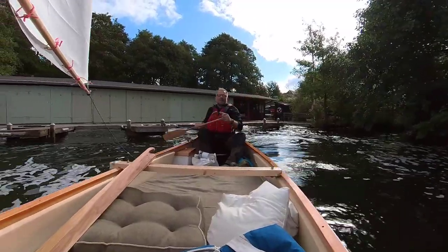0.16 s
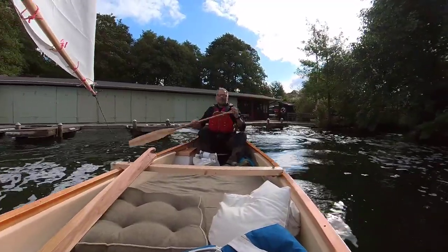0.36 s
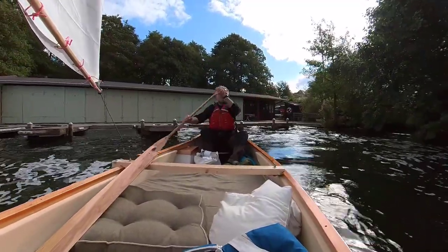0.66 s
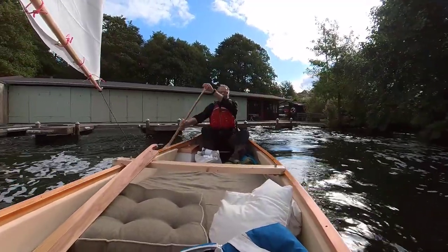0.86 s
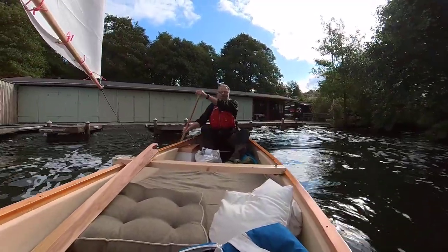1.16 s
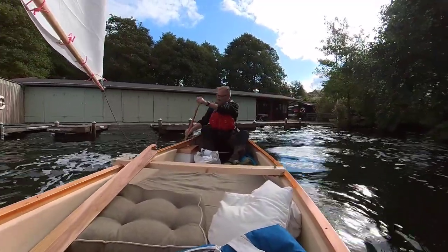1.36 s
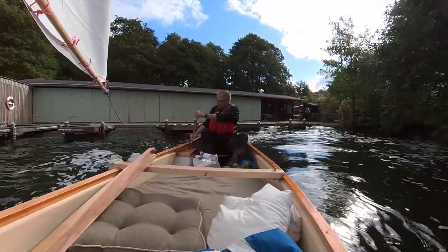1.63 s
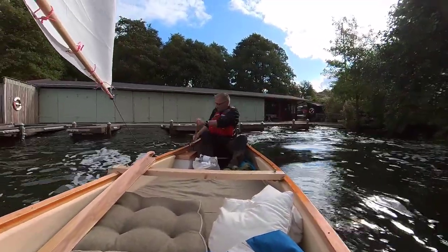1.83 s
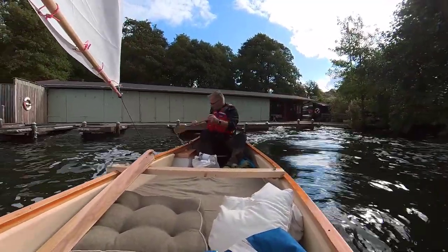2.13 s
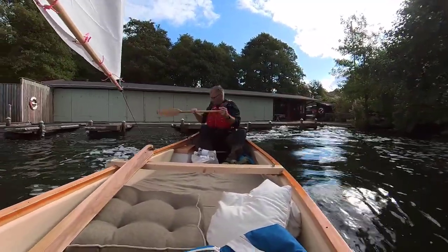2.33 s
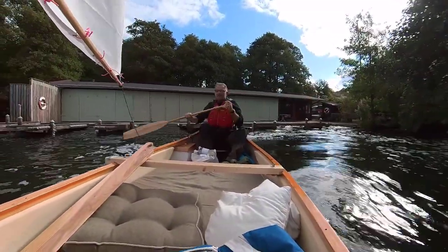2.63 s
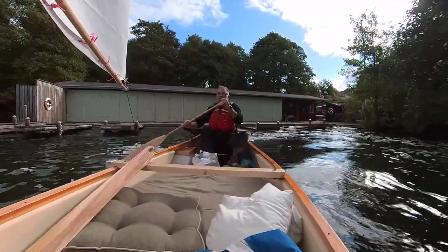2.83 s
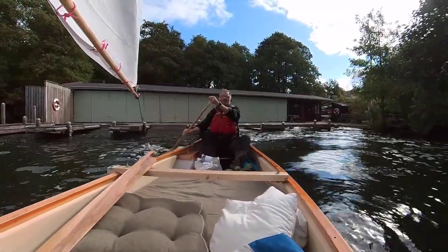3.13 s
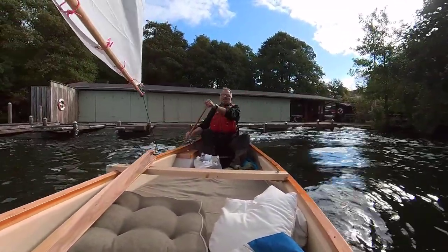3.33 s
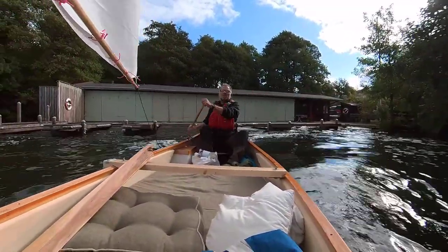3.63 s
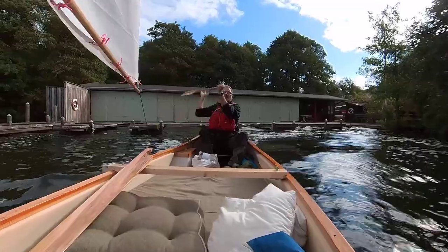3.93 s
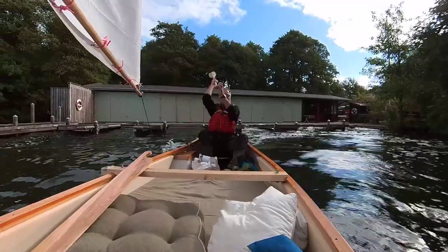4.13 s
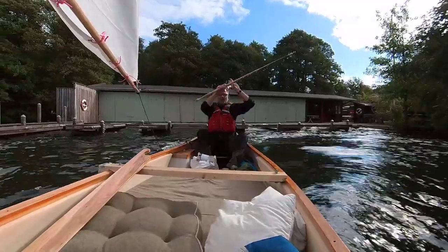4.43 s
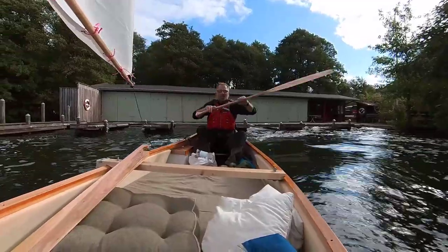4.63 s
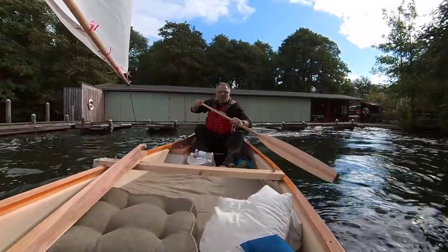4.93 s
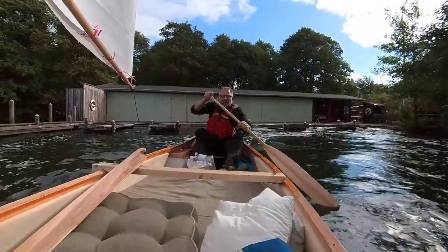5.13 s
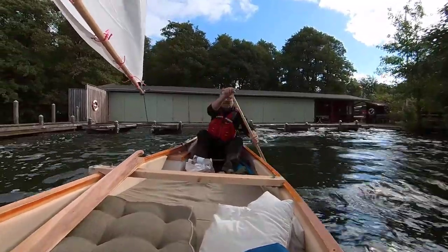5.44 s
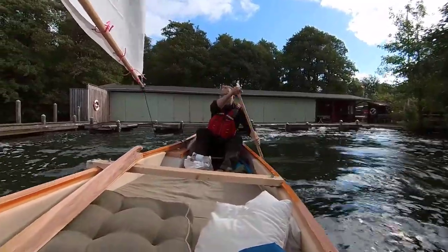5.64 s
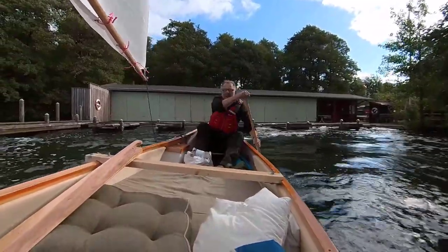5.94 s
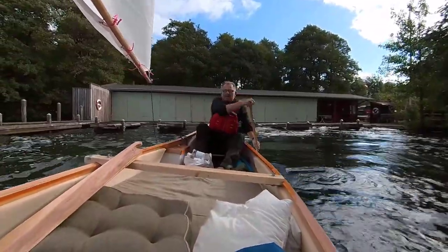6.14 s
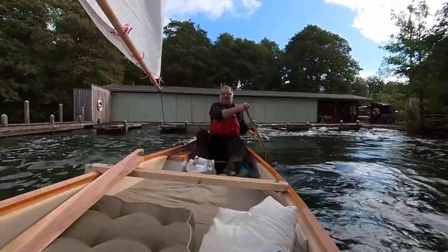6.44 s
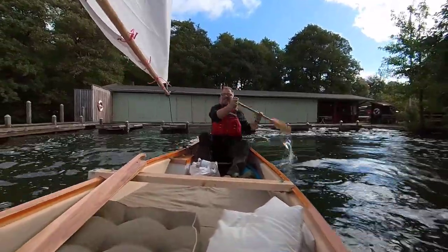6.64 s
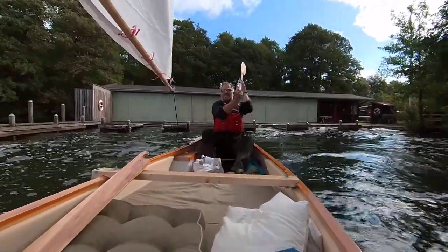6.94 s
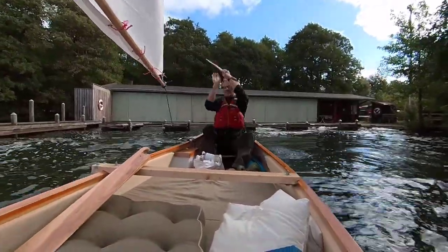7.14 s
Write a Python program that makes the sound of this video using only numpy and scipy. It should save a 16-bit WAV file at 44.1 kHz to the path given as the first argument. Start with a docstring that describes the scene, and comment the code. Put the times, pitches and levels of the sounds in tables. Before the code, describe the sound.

From inside a wooden canoe on calm open water, soft gurgling runs along the planks with a few quiet bubbles. A cluster of hollow slaps and splashes strikes after two seconds, another past three and a half, then harder thumps near four and a half, five and six. Drops tick and spray patters between them; low wind buffets the close stereo microphone unevenly.

```python
"""Wooden canoe over small waves

Heard from inside the boat. Waves slap the hull: ringing air pockets thump, then filtered bubble swarms churn.
Water breaks in short bursts of foam, single bubbles plop as gliding tones, and spray patters and fizzes back.
Drops tick, the bow wave folds over and water gurgles along the planks, all built from swarms or single rings.
Gusts buffet the microphone as low, lumpy noise that hits its two ports unequally.
"""
import sys
import numpy as np
from scipy import signal
from scipy.io import wavfile
from scipy.ndimage import uniform_filter1d

SR = 44100
rng = np.random.default_rng(int(sys.argv[2]) if len(sys.argv) > 2 else 0)


def persist_wave(psi):
    """Save psi, clipped to +-1, as 16-bit WAV."""
    counts = np.round(np.clip(psi, -1, 1) * 32767).astype(np.int16)
    wavfile.write(sys.argv[1], SR, np.atleast_2d(counts).T)


N = 321489
TIME = np.arange(N) / SR

# Waves striking the hull: start_s, thump_peak_db, pocket_pitch_hz, pocket_t60_s, churn_level_db
HULL_SLAPS = [(0.026, -21.5, 188, 0.046, -45), (0.44, -32, 338, 0.14, -36.5),
              (0.813, -34, 234.5, 0.38, -42), (1.006, -32.5, 404, 0.15, -36.5),
              (1.187, -26.5, 148, 0.05, -55), (1.221, -28.5, 198, 0.089, -41), (1.27, -30, 272, 0.12, -48),
              (2.246, -23.5, 240, 0.028, -37), (2.314, -19.5, 408, 0.03, -17.5),
              (2.3234, -18, 270, 0.016, -28), (2.358, -13.5, 380, 0.054, -20),
              (2.3787, -4.5, 304, 0.011, -20.5), (2.3847, -5.5, 217, 0.026, -17),
              (2.403, -5, 298, 0.018, -39), (2.446, -15.5, 248, 0.03, -37), (3.456, -27, 134, 0.13, -39),
              (3.5841, -8.5, 350, 0.019, -21), (3.592, -13.5, 237, 0.026, -31),
              (3.618, -18.5, 415.5, 0.18, -31), (3.66, -11.5, 242, 0.01, -26),
              (4.111, -17.5, 205, 0.023, -46), (4.247, -27, 240, 0.064, -51), (4.277, -20, 197, 0.088, -49),
              (4.356, -13, 142, 0.018, -58), (4.46, -28, 220, 0.07, -50), (4.532, -21, 308, 0.017, -44),
              (4.6585, -1, 295, 0.012, -14.5), (4.677, -10.5, 240, 0.088, -17.5),
              (4.7085, -4, 122, 0.048, -26), (4.783, -24, 199, 0.08, -33), (5.07, -35, 261, .06, -25.5),
              (5.1645, 0.5, 175, 0.1, -16.5), (5.187, -15, 386, 0.077, -18),
              (5.258, -22, 141, 0.087, -25.5), (5.299, -24.5, 312, 0.092, -32),
              (5.465, -26.5, 126.4, 0.22, -55), (5.824, -18, 330, 0.012, -30),
              (5.869, -17, 400, 0.045, -25), (5.893, -11, 350, 0.019, -12.5),
              (5.9028, 2.5, 286, 0.0097, -28), (5.923, -7.5, 133, 0.12, -23.5),
              (6.198, -21, 284, 0.086, -45), (6.14, -28.5, 379, 0.11, -50), (6.379, -28, 330, 0.03, -39),
              (6.769, -32, 365, 0.12, -50), (6.794, -26.5, 273.4, 0.25, -38), (6.885, -32, 369, 0.17, -47),
              (6.947, -21, 284, 0.024, -34), (7.05, -24.5, 261, 0.12, -29), (7.0865, -9, 296, 0.032, -24.5),
              (7.098, -12, 274, 0.06, -34), (7.149, -22.5, 228, 0.056, -48), (7.229, -20, 266, 0.1, -43)]
# Water breaking on planks and paddle: start_s, level_db, centre_hz, t60_s, fizz_against_body_db
WATER_BREAKS = [(.326, -61, 2000, 0.48, 13.5), (.883, -38.5, 1490, 0.11, -13),
                (1.051, -43, 2200, 0.088, -7), (1.17, -41, 1500, 0.36, -27),
                (1.816, -37.5, 1300, 0.055, -25), (1.985, -47, 2600, 0.06, 3),
                (2.241, -33, 780, 0.12, -9.5), (2.302, -22, 1250, 0.17, -15.5),
                (2.346, -32, 1800, 0.29, -1), (2.356, -20.5, 870, 0.16, -14), (2.369, -30, 1550, 0.13, -5),
                (2.515, -32, 800, 0.1, -12), (2.565, -44, 3400, 0.18, -8), (2.992, -52.5, 5830, 0.22, -17),
                (3.233, -42.5, 1830, 0.27, -15), (3.3625, -30, 1200, 0.038, -28),
                (3.372, -38, 750, 0.41, -32), (3.521, -30, 2000, 0.075, -13),
                (3.545, -30.5, 1700, 0.12, -11), (3.576, -28, 1580, 0.052, -25),
                (3.615, -26, 710, 0.36, -34), (3.656, -28.5, 880, 0.14, -8), (3.954, -23, 1500, 0.022, -16),
                (4.564, -48, 4600, 0.17, -2), (4.65, -29, 2330, 0.053, -8), (4.654, -27.5, 860, 0.33, -4),
                (4.659, -25, 1400, 0.11, -9), (4.687, -20, 950, 0.14, -15), (4.532, -32, 850, 0.08, -19),
                (5.064, -26, 1420, 0.071, -15.5), (5.163, -19.5, 810, 0.04, -27),
                (5.185, -48.5, 1710, 0.25, -5), (5.462, -40.5, 1950, 0.14, 4.5),
                (5.826, -29, 1070, 0.11, -39), (5.866, -24.5, 850, 0.45, -36),
                (5.88, -24.5, 1140, 0.089, -19), (5.893, -28.5, 860, 0.24, -1),
                (5.899, -29, 1400, 0.056, -3), (6.22, -39, 1210, 0.29, -1), (6.455, -45, 3100, 0.1, -5),
                (6.68, -42.5, 3250, 0.11, -5), (6.706, -40.5, 4300, 0.18, 0), (6.714, -39, 2900, 0.067, -5),
                (7.082, -37.5, 1300, 0.24, 5.5), (7.222, -39, 1100, 0.16, -17)]
# The clearest single bubbles: start_s, peak_db, pitch_hz, glide_octaves_per_t60
CLEAR_BUBBLES = [(.062, -37, 532, 0.25), (.262, -40, 714, 0.69), (0.285, -39, 760, 0.44),
                 (0.296, -47, 1560, 0.21), (0.5, -47, 880, 0.66), (0.678, -48, 1510, 0.56),
                 (0.711, -45, 1230, -0.12), (.77, -32, 582, 0.27), (.929, -40, 2030, 0.29),
                 (0.991, -36, 1920, -0.26), (1.02, -34, 740, 0.48), (1.081, -39, 1240, 0.4),
                 (1.179, -40, 1520, 0.61), (1.232, -38, 1390, -0.2), (1.241, -28, 445, 0.21),
                 (1.871, -31.5, 516, 0.94), (1.959, -31, 421, -0.25), (2.298, -31, 1700, -0.16),
                 (2.304, -19, 1290, 0.073), (2.308, -24, 696, -0.61), (2.364, -14, 793, -0.45),
                 (3.194, -30.5, 1170, 0.5), (3.4, -31, 1410, 0.015), (3.363, -31.5, 607, 0.44),
                 (3.421, -30, 403, 0.86), (3.483, -27, 834, 0.61), (3.547, -31, 1360, 1),
                 (3.587, -24.5, 1390, 0.23), (3.614, -22.5, 786, 0.082), (3.616, -41, 2000, 0.2),
                 (3.636, -25, 807, 0.22), (3.763, -31, 1910, 0.76), (3.783, -23.5, 1700, 0.19),
                 (3.672, -36, 1110, 0.46), (3.853, -41, 555, 0.3), (3.903, -35, 1210, -0.046),
                 (3.995, -31, 1480, 0.6), (4.002, -31, 1980, 0.15), (4.028, -27.5, 965, 0.9),
                 (4.049, -36, 1444, 0.56), (4.063, -43, 734, 0.13), (4.538, -30, 705, -0.82),
                 (4.834, -38, 2030, 0.29), (4.916, -30.5, 686, 0.075), (4.991, -23.5, 570, 0.82),
                 (5.431, -41, 2450, -0.39), (5.459, -14.5, 673, -0.32), (5.621, -39, 844, 0.12),
                 (5.772, -41, 1260, 1), (5.8255, -14.5, 990, -0.43), (6.096, -41, 943, 0.47),
                 (6.125, -44, 1220, 0.065), (6.219, -30.5, 1234, 0.94), (6.234, -39, 1900, 0.3),
                 (6.312, -45, 1510, 0.2), (6.415, -34, 523, 0.48), (6.71, -30.5, 3700, -0.8),
                 (6.717, -35, 2380, -0.8), (6.725, -42, 1600, -0.14), (6.927, -37, 1013, 0.5),
                 (6.945, -25, 1180, 0.13), (6.978, -39, 1700, -0.25), (7.052, -41.5, 1390, 0.2),
                 (7.098, -29, 1314, 0.25), (7.226, -47, 1080, 0.083)]
# Showers of spray and paddle drips falling back: crest_s, level_db, build_up_s
SPRAY_SHOWERS = [(.98, -54.5, 0.21), (1.58, -56.5, 0.28), (2.4, -46.5, 0.13), (2.59, -43.5, 0.1),
                 (3.72, -46.5, 0.12), (4.04, -40, 0.2), (4.97, -44.5, 0.086), (6.17, -46.5, 0.27),
                 (7.1, -53, 0.54)]
# Side of the boat on which the water breaks: time_s, left_minus_right_db
BREAKING_SIDE = [(0, -4), (2.15, -3), (2.6, 2.5), (3.2, -5), (4.05, 2.5), (5.8, -1.5), (6.2, 2.5),
                 (7.29, -1)]
# Sharp ticks: single drops landing on water and wood, and at 3.954 s the hard crack that opens a splash:
# start_s, peak_db (ahead of panning), pitch_hz
DROP_TICKS = [(2.307, -24.5, 2570), (2.567, -26, 3220), (2.669, -29, 1630), (3.236, -32, 3420),
              (3.341, -36, 2290), (3.577, -21, 980), (3.673, -27, 1890), (3.954, -18.5, 840),
              (3.956, -25, 2000), (4.231, -38, 1860), (4.436, -39.5, 2350), (5.066, -41, 1880),
              (5.3897, -26, 2570), (5.39, -25, 3450), (5.4704, -27, 2180), (5.488, -34, 4430),
              (6.088, -36, 2940), (6.193, -31, 2590), (6.277, -21.5, 604), (6.381, -32.5, 2400),
              (6.381, -32, 584), (6.458, -43, 1700), (6.476, -39, 1880), (6.926, -44, 2680),
              (6.563, -39, 6500)]
# The bow wave tumbling over beside the planks: crest_s, level_db, build_up_s
BOW_SURGES = [(1.33, -42, 0.12), (1.58, -44.5, 0.25), (3.42, -40, 0.019), (3.87, -43.5, 0.12)]
# Water running along the hull: time_s, level_db (ahead of the gurgle's trim)
HULL_WATER = [(0, -38.5), (0.2, -43.5), (0.36, -43), (0.58, -44.5), (0.92, -43), (1.12, -44), (1.28, -37),
              (1.7, -40), (2.07, -42.5), (2.42, -36.5), (3.08, -42), (3.6, -40), (4.0, -37), (4.3, -44.5),
              (4.6, -41.5), (5.12, -38.5), (5.33, -44.5), (5.48, -40.5), (5.63, -43), (5.73, -47),
              (5.9, -45.5), (6.25, -37.5), (6.7, -43.5), (6.98, -37.5), (7.29, -45.5)]
# Gusts that swell and die at the microphone: crest_s, level_db (ahead of the wind gain),
# half_length_s, left_minus_right_db
WIND_GUSTS = [(0.1, -43, 0.034, -19), (0.683, -56.5, 0.41, 17), (1.65, -55.5, 0.56, 0),
              (2.417, -66, 0.11, -12), (2.92, -48.5, 0.26, 5.5), (4.178, -38.5, 0.25, -1.5),
              (5.21, -32.5, 0.084, 4), (6.28, -40.5, 0.27, -1), (6.608, -44.5, 0.11, -6),
              (7.231, -29.5, 0.035, 1)]
# Single eddies popping on the microphone: start_s, peak_db (ahead of panning), left_minus_right_db
EDDY_POPS = [(0.101, -41, 7), (2.808, -31.5, 8), (2.869, -20, 28), (2.979, -30, -11), (3.973, -19, -1),
             (4.036, -23, 15), (4.059, -26.5, -4), (4.202, -17, 25), (4.224, -18, -18), (4.29, -16, -9),
             (4.438, -23, -2), (6.2, -10.5, 25), (6.277, -10.5, 13), (6.404, -17.5, -6), (6.547, -21.5, -1),
             (6.576, -20, -1), (7.221, -15, -23)]

# Spectrum of the light churning after a slap: frequency_hz, relative_level_db
CHURN_SPECTRUM = [(30, -38), (70, -23.5), (130, -3), (230, 1), (400, -2), (540, -13.5), (900, -24),
                  (2000, -39.5), (6000, -61)]
# Spectrum of the boom of large, low pockets: frequency_hz, relative_level_db
BOOM_SPECTRUM = [(25, -40.5), (45, 2), (80, 4.5), (125, 6), (200, 1.5), (330, -8), (520, -10.5), (900, -33),
                 (4000, -63)]
# Spectrum of falling drops: frequency_hz, relative_level_db
SPRAY_SPECTRUM = [(200, -16.5), (700, -3.5), (1500, 2), (2500, -1.5), (4000, -5.5), (5500, -7.5),
                  (7000, -15), (8000, -24), (9000, -40.5)]
# Spectrum of the finest drops: frequency_hz, relative_level_db
FIZZ_SPECTRUM = [(800, -23.5), (2200, 10.5), (3500, 0.5), (5200, -0.5), (6800, -3.5), (8000, -12),
                 (9000, -24.5)]
# Spectrum of the tumbling bow wave: frequency_hz, relative_level_db
SURGE_SPECTRUM = [(100, -17), (250, 2.5), (450, 5), (750, 5), (1200, -7.5), (2000, -12), (4000, -22.5),
                  (8000, -50)]
# Spectrum of water along the planks: frequency_hz, relative_level_db
GURGLE_SPECTRUM = [(30, -26), (70, 0), (140, -1.5), (350, 1.5), (550, -3), (800, -5), (1300, -11),
                   (2000, -16.5), (3500, -26.5), (8000, -44)]
# Spectrum of wind on the microphone: frequency_hz, relative_level_db
WIND_SPECTRUM = [(20, -14.5), (45, -10), (90, 2), (170, -2), (280, -13), (450, -27), (1000, -41.5),
                 (4000, -62)]
# Stereo width: frequency_hz, side_against_mid_db
STEREO_WIDTH = [(50, -11), (300, -25), (600, -16), (1200, -10.5), (2400, -4.5), (4500, -3.5), (8000, 0.5)]

# Pockets larger (lower) than the usual one churn longer and boom
CHURN_T60_S, USUAL_POCKET_HZ, CHURN_SIZE_POWER = 0.53, 236, 0.92
SPATTER_DB = -28  # small bubbles torn off a slap, against its churning
SPLASH_RISE_S = 0.0013  # shortest rise; longer splashes add to it
# A usual bubble and its ring; stronger ones are damped in fewer cycles
USUAL_BUBBLE_DB, BUBBLE_CYCLES, DAMPING_PER_DB = -17, 36.7, 0.045
SHOWER_FALL, SURGE_FALL = 0.63, 1.27  # fall time as a share of the build-up
PATTER_DB = -18  # steady patter that rises and falls with the gurgle, against the hull water's level
DRIPS_DB, TRICKLE_DB = -19, -7  # single near drops and ringing drips, against the shower
TICK_CYCLES, TICK_FIZZ_DB, TICK_FIZZ_T60_S = 9.9, -29, 0.014  # a drop's brief ring and its droplets' fizz
CLEAR_SHARE = 0.27  # gain of clearly ringing bubbles against the soft ones
WIND_GAIN_DB, BREEZE_DB = 9.5, -67  # gain on all steady wind; breeze between gusts ahead of that gain
WIND_SHARED = 0.22  # share of the wind noise that also reaches the other port
EDDY_HZ = 162.5
EDGE_HZ = 8700  # upper band limit


def slaps():
    """Each wave traps air under the hull: a thump, then churn and spatter; large, low pockets make the wood boom."""
    thumps, light, deep = np.zeros(N), np.zeros(N), np.zeros(N)
    t = TIME[:SR]
    for s, thump_db, hz, t60, churn_db in HULL_SLAPS:
        add(thumps, s, amp(thump_db) * ring(hz, t60, glide=-0.055, rise=0.22))
        churn_t60 = CHURN_T60_S * (USUAL_POCKET_HZ / hz) ** CHURN_SIZE_POWER
        onset = 1 - np.exp(-t / 0.00085)
        power = (amp(churn_db) * decay(t, churn_t60) * onset) ** 2
        boom_share = 1 / (1 + (hz / USUAL_POCKET_HZ) ** 4)
        add(deep, s, power * boom_share)
        add(light, s, power * (1 - boom_share))
    pockets = cloud(per_s=1500, low_hz=46, high_hz=1550, cycles=16, spread_db=0.8)
    churn = texture(pockets, CHURN_SPECTRUM, clump_db=-1.0) * np.sqrt(light)
    # The same swarm, shifted in time so that boom and churn do not move together
    boom = texture(np.roll(pockets, N // 3), BOOM_SPECTRUM, clump_db=-1.0) * np.sqrt(deep)
    spatter = cloud(per_s=700, low_hz=550, high_hz=2200, cycles=22, spread_db=1.5, rise_oct=0.5)
    return thumps + churn + boom + amp(SPATTER_DB) * spatter * np.sqrt(light)


def splashes():
    """A sheet of water breaks: a burst of bubbles around one size, with a fizz of fine drops."""
    out = np.zeros((2, N))
    t = TIME[:SR // 2]
    foam = cloud(per_s=3400, low_hz=190, high_hz=9400, cycles=28, spread_db=1.5, rise_oct=0.35)

    def burst(body_start, fizz_start, body, fizz_db):
        bubbles = unit(colour(foam[body_start:body_start + len(t)], body))
        fizz = unit(colour(foam[fizz_start:fizz_start + len(t)], SPRAY_SPECTRUM))
        return bubbles + amp(fizz_db) * fizz

    for s, db, hz, t60, fizz_db in WATER_BREAKS:
        body = [(hz / 6, -24), (hz / 2, -7), (hz, 0), (hz * 1.2, -6), (hz * 1.87, -20), (hz * 8, -46)]
        onset = 1 - np.exp(-t / (SPLASH_RISE_S + 0.0043 * t60))  # long splashes break slowly
        fade = amp(db) * onset * decay(t, t60)
        a, b, c, d = rng.integers(0, N - len(t), size=4)  # chance excerpts of the foam
        mid = fade * burst(a, b, body, fizz_db)
        side = fade * burst(c, d, body, fizz_db)
        add(out, s, stereo(mid, side))
    return out


def plops():
    """Large single bubbles ring out beside the hull; small ones and violent ones die sooner."""
    out = np.zeros(N)
    for s, db, hz, glide in CLEAR_BUBBLES:
        cycles = BUBBLE_CYCLES * np.exp(-DAMPING_PER_DB * (db - USUAL_BUBBLE_DB))
        add(out, s, amp(db) * ring(hz, cycles / hz, glide, rise=0.64))
    return out


def spray():
    """Thrown drops patter back and near drips ring with rising pitch; heavier showers carry more fine fizz."""
    drops = cloud(per_s=2600, low_hz=600, high_hz=9000, cycles=30, spread_db=2.2, rise_oct=0.3)
    mist = cloud(per_s=2200, low_hz=2500, high_hz=9000, cycles=75, spread_db=1.9, rise_oct=0.08)
    near = cloud(per_s=70, low_hz=1100, high_hz=6000, cycles=22, spread_db=2.2)
    trickle = cloud(per_s=60, low_hz=600, high_hz=2600, cycles=48, spread_db=1.7, rise_oct=0.8)
    patter = amp(-1.5) * texture(drops, SPRAY_SPECTRUM, clump_db=2)
    fizz = amp(-3.0) * texture(mist, FIZZ_SPECTRUM, clump_db=2)
    drips = amp(DRIPS_DB) * unit(colour(near, SPRAY_SPECTRUM))
    wash = amp(PATTER_DB) * level(HULL_WATER)
    thrown = swells(SPRAY_SHOWERS, SHOWER_FALL)
    shower = np.hypot(thrown, wash) * amp(1.0 * drift(30))
    heaviness = (shower / shower.max()) ** 0.083
    return shower * (patter + heaviness * fizz + drips) + amp(TRICKLE_DB) * thrown * trickle


def ticks():
    """Heavy drops land close by, or a splash cracks open: a sharp, briefly ringing tick and a trace of fizz."""
    out = np.zeros((2, N))
    t = TIME[:SR // 10]
    for s, db, hz in DROP_TICKS:
        hiss = unit(colour(rng.standard_normal(len(t)), SPRAY_SPECTRUM))
        fizz = hiss * decay(t, TICK_FIZZ_T60_S)
        add(out, s, amp(db) * ring(hz, TICK_CYCLES / hz, rise=0.83))
        add(out, s, amp(db + TICK_FIZZ_DB) * fizz)
    return out


def surges():
    """The bow wave folds over in a full, patchy wash of closely packed bubbles."""
    packed = cloud(per_s=5000, low_hz=180, high_hz=3000, cycles=30, spread_db=1.2, rise_oct=0.3)
    return texture(packed, SURGE_SPECTRUM, clump_db=-2.5) * swells(BOW_SURGES, SURGE_FALL)


def gurgle():
    """Countless soft bubbles where the water slides along the planks, some ringing clearly."""
    soft = cloud(per_s=3800, low_hz=90, high_hz=4800, cycles=20, spread_db=2.2)
    clear = cloud(per_s=70, low_hz=260, high_hz=1700, cycles=55, spread_db=1.4, rise_oct=0.7)
    bubbles = unit(soft + CLEAR_SHARE * clear)
    water = texture(bubbles, GURGLE_SPECTRUM, clump_db=1.5)
    return amp(-0.5) * water * level(HULL_WATER) * amp(1.0 * drift(22))


def wind():
    """Eddies hit the two microphone ports unequally, in low lumps; single strong ones pop."""
    def lumpy_noise():
        rumble = colour(rng.standard_normal(N), WIND_SPECTRUM)
        return unit(rumble * amp(6.5 * drift(55)))

    ports = np.array([lumpy_noise(), lumpy_noise()])
    power = np.full((2, N), amp(BREEZE_DB) ** 2)
    for *gust, side_db in WIND_GUSTS:
        power += (panned(side_db)[:, None] * swells([gust])) ** 2
    out = amp(WIND_GAIN_DB) * (ports + WIND_SHARED * ports[::-1]) * np.sqrt(power)
    for s, db, side_db in EDDY_POPS:
        pop = ring(EDDY_HZ, 5 / EDDY_HZ, glide=-0.21, rise=0.4)
        add(out, s, amp(db) * panned(side_db)[:, None] * pop)
    return out


def ring(hz, t60, glide=0, rise=0.35):
    """An air pocket swells over `rise` cycles, pulsates and dies; its pitch glides by octaves per t60."""
    t = np.arange(int(t60 * SR) + 8) / SR
    turns = np.cumsum(hz * 2 ** (glide * t / t60)) / SR
    fade = decay(t, t60) * (1 - np.exp(-(turns / rise) ** 2))
    return np.sin(2 * np.pi * turns) * fade / fade.max()


def cloud(per_s, low_hz, high_hz, cycles, spread_db, rise_oct=0.13, count=48):
    """A swarm of small ringing pockets of all sizes, with an even spectrum."""
    out = np.zeros(N)
    births = max(int(per_s * N / SR / count), 1)  # in each size band
    for hz in np.geomspace(low_hz, high_hz, count):
        life, glide, detune = rng.random(3)
        when, size = rng.random((2, births))
        signs = (-1) ** np.arange(births)
        clicks = np.zeros(N)
        clicks[(when * N).astype(int)] = amp(spread_db * np.minimum(-np.log(size), 3.5)) * signs
        grain = ring(hz * (0.924 + 0.271 * detune), cycles * (0.5 + life) / hz, rise_oct * glide)
        out += np.sqrt(hz) * unit(signal.oaconvolve(clicks, grain)[:N])
    return unit(out)


def texture(grains, spectrum, clump_db):
    """Near grains over a noise wash of far ones, clumped, coloured and spread over both ports."""
    water = clump(grains + 0.65 * rng.standard_normal(N), clump_db)
    mid = unit(colour(water, spectrum))
    return stereo(mid, np.roll(mid, N // 2))


def clump(x, depth_db, size=7, count=9):
    """Bubbles are born in clumps of like size: patches a few hundred Hz wide and some tens of ms long."""
    z = signal.stft(x, nperseg=512, noverlap=384)[2]
    patches = uniform_filter1d(rng.standard_normal(z.shape), size, axis=0)
    patches = uniform_filter1d(patches, count, axis=1)
    return signal.istft(z * amp(depth_db * unit(patches)), nperseg=512, noverlap=384)[1][:N]


def colour(x, points, size=4096):
    """A causal, minimum-phase filter with the given spectrum."""
    hz, db = np.transpose(points)
    bins_hz = abs(np.fft.fftfreq(size, 1 / SR)) + 1
    log_gain = np.log(amp(np.interp(np.log(bins_hz), np.log(hz), db)))
    taps = np.fft.ifft(np.exp(np.conj(signal.hilbert(log_gain)))).real[:size // 2]
    return signal.oaconvolve(x, taps)[:len(x)]


def stereo(mid, side):
    """Two close ports hear nearly the same low mids and, from there up, ever less alike treble."""
    side = colour(side, STEREO_WIDTH)
    return np.array([mid + side, mid - side])


def panned(side_db):
    """Left and right gains of constant power."""
    pair = np.array([amp(side_db / 2), amp(-side_db / 2)])
    return pair / np.sqrt(np.mean(pair ** 2, axis=0))


def swells(rows, fall=1):
    """The gain of overlapping bell-shaped swells at every sample, added by power."""
    power = np.zeros(N)
    for s, db, rise_s in rows:
        width_s = np.where(TIME < s, rise_s, fall * rise_s)
        power += amp(db) ** 2 * np.exp(-2 * ((TIME - s) / width_s) ** 2)
    return np.sqrt(power)


def drift(per_s):
    """Slow chance: straight lines between normal random knots."""
    knots = rng.standard_normal(2000)
    return np.interp(TIME * per_s, np.arange(len(knots)), knots)


def level(rows):
    """The gain that a curve of times and dB gives at every sample."""
    return amp(np.interp(TIME, *np.transpose(rows)))


def decay(t, t60):
    """Exponential fade that loses 60 dB in t60 seconds."""
    return np.exp(-np.log(1000) * t / t60)


def amp(db):
    """Decibels to gain."""
    return 10 ** (np.asarray(db) / 20)


def unit(x):
    """Scales to rms 1."""
    return x / np.sqrt(np.mean(x ** 2) + 1e-20)


def add(mix, s, sound):
    """Mixes a sound in at time s."""
    part = mix[..., max(round(s * SR), 0):][..., :sound.shape[-1]]
    part += sound[..., :part.shape[-1]]


def scene():
    """Water and wind around the boat; spray follows the paddle's side, splashes sit a little further left."""
    side_db = np.interp(TIME, *np.transpose(BREAKING_SIDE))
    thrown = panned(side_db) * (spray() + ticks()) + panned(side_db + 1.5) * splashes()
    return slaps() + thrown + plops() + surges() + gurgle() + wind()


def record(dry):
    """The microphone sheds the deepest rumble, peaks clip at full scale, then the treble is band-limited."""
    lean = signal.sosfilt(signal.butter(4, 43, "highpass", fs=SR, output="sos"), dry)
    taps = signal.firwin(301, EDGE_HZ, window=("kaiser", 7), fs=SR)
    return signal.oaconvolve(np.clip(lean, -1, 1), taps[None], "same")


dry = scene()
out = record(dry)
persist_wave(out)
```